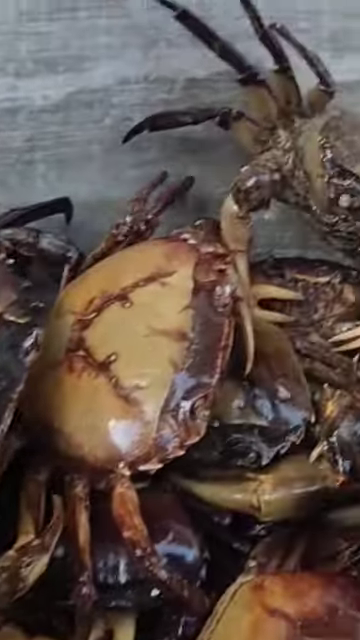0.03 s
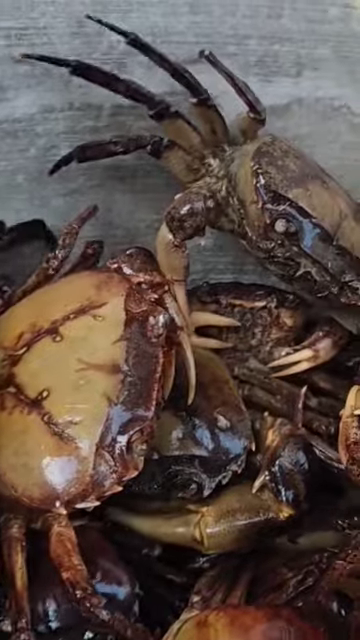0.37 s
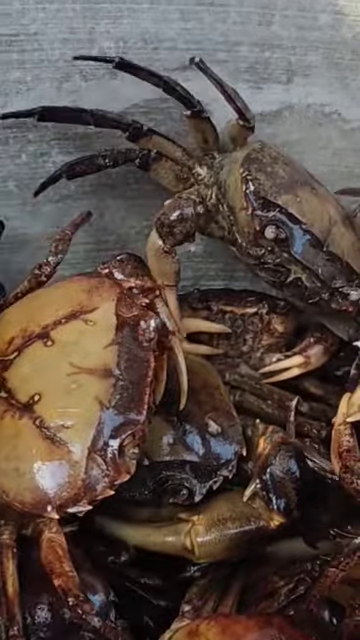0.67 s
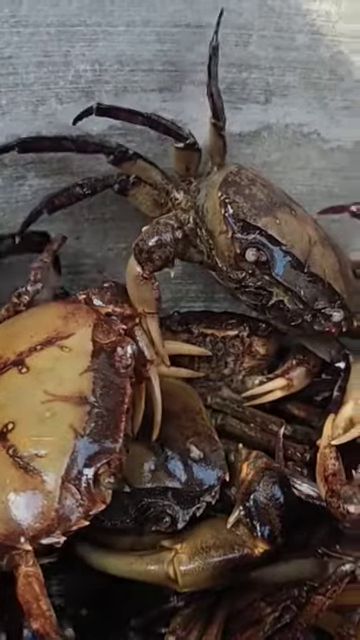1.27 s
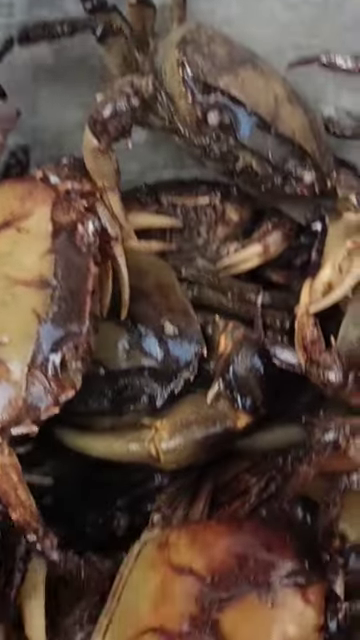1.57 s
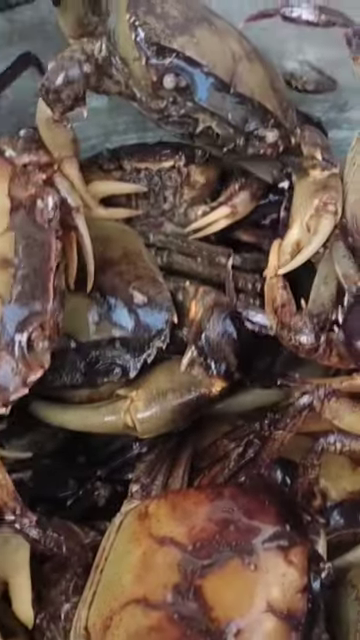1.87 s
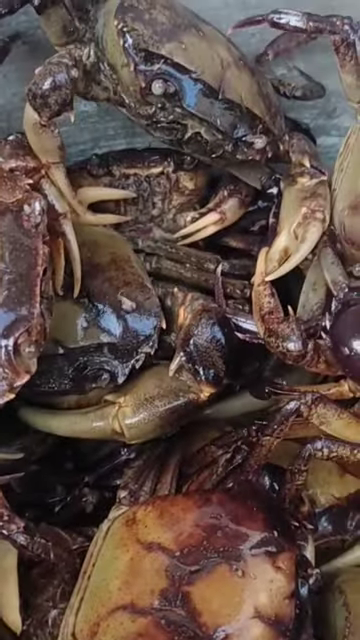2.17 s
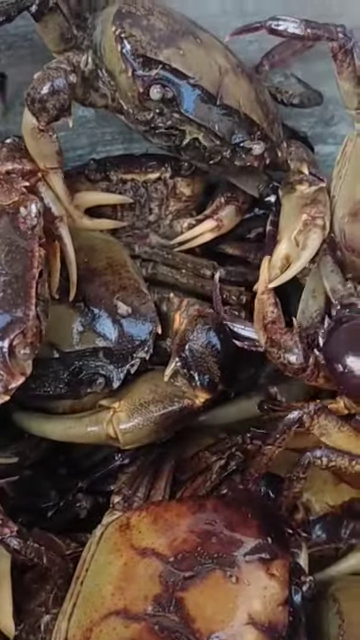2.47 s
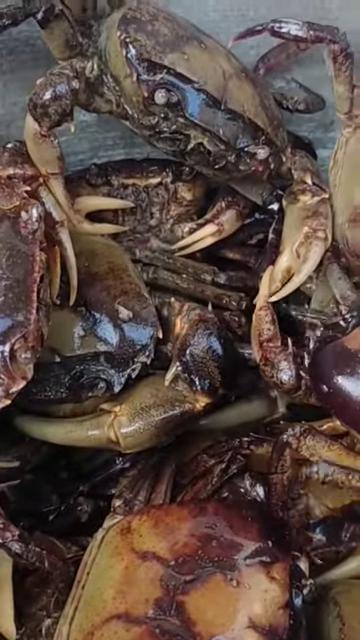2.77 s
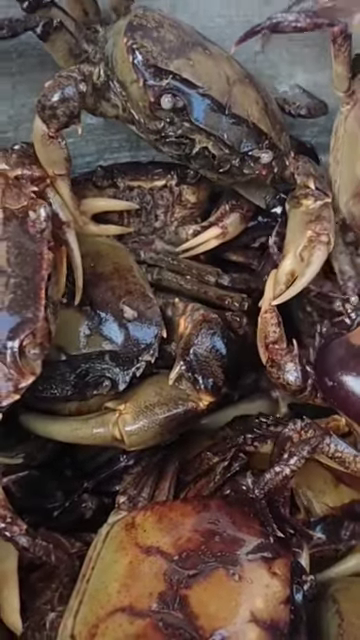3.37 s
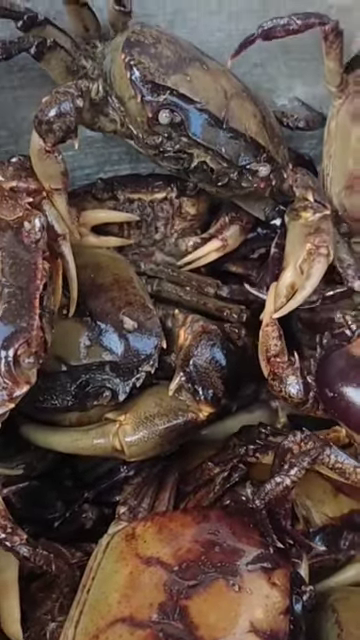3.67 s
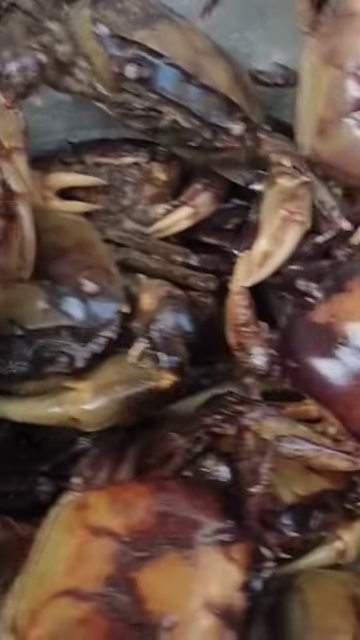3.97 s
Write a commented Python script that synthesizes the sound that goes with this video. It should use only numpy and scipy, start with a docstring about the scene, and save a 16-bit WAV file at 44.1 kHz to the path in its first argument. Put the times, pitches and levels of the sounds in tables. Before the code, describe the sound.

Crab legs scrape and wet shells click in a tub, with a low hum behind.

```python
"""Live crabs in a tub

A heap of crabs shifts close by in a hard-walled tub. Leg tips scrape by stick-slip friction,
wet shells snap and knock, and many tiny contacts merge into rustle and fizz. The contacts excite
the tub's resonances, and its wall bumps once. Behind it lies a steady low rumble with a machine hum."""
import sys
import numpy as np
from scipy import signal
from scipy.fft import rfft, irfft
from scipy.io import wavfile
from scipy.ndimage import uniform_filter1d

SR = 44100
rng = np.random.default_rng(int(sys.argv[2]) if len(sys.argv) > 2 else 0)


def bounce(signal):
    """Save signal as a 16-bit WAV file at the path given by the first command-line argument."""
    frames = np.transpose(np.atleast_2d(signal))
    limited = np.clip(frames, -1, 1)
    pcm = np.round(limited * 32767).astype(np.int16)
    wavfile.write(sys.argv[1], SR, pcm)


N = 176400
T = np.arange(N) / SR
BINS = np.fft.rfftfreq(4096, 1 / SR)
TUB_T60_S, WET_T60_S = 0.056, 0.02  # reverberation times of scraping and of wet clicks


def amp(db):
    """Decibels to amplitude ratio."""
    return 10 ** (np.asarray(db) / 20)


def unit_rms(x):
    """Normalisation to an rms of 1."""
    return x / np.sqrt(np.mean(x ** 2) + 1e-20)


def spectrum_at(points, hz):
    """Interpolation on a log-frequency axis."""
    freqs, values = np.transpose(points)
    return np.interp(np.log(hz + 1), np.log(freqs + 1), values)


def drift(cutoff_hz):
    """Low-pass noise of rms 1: a slow random fluctuation."""
    hz = np.fft.rfftfreq(N, 1 / SR)
    return unit_rms(irfft(rfft(rng.standard_normal(N)) / (1 + (hz / cutoff_hz) ** 2), N))


def add(mix, start_s, sound):
    """Superposition of a stereo sound on the mix."""
    part = mix[:, max(round(start_s * SR), 0):][:, :sound.shape[1]]
    part += sound[:, :part.shape[1]]


def resonance_db(centre_hz, width_hz, lift_db):
    """A resonance as a Lorentzian peak on the decibel spectrum."""
    return lift_db / (1 + (2 * (BINS - centre_hz) / width_hz) ** 2)


def leg_colour_db():
    """Spectral ripple: each leg or shell has its own peaks and dips, which blur in the treble."""
    knots_hz = np.arange(0, SR, 330)
    ripple_db = 2.5 * np.interp(BINS, knots_hz, rng.standard_normal(len(knots_hz)))
    return ripple_db * np.exp(-(BINS / 8000) ** 2)


def tub_ring(x, tone_db):
    """Resonance: a minimum-phase filter applies a contact's tone, the tub's modes and a stereo balance."""
    # Modes of the tub: centre_hz, width_hz, lift_db
    modes = [(932, 50, 9.5), (1860, 24, 10.5), (2170, 25, 6.5), (2383, 100, 5), (2670, 31, 0),
             (5040, 31, 7.5)]
    # Stereo balance of the heap: frequency_hz, left_minus_right_db
    balance = [(500, 15.5), (1100, -10), (3200, -5.5), (4300, 5.5), (6000, 1.5), (12500, 18.5)]
    response_db = tone_db + sum(resonance_db(*mode) for mode in modes)
    left = amp(spectrum_at(balance, BINS))
    gain = amp(response_db) * np.array([left, np.ones_like(left)]) / np.hypot(left, 1)
    log_gain = np.log(np.hstack([gain, gain[:, -2:0:-1]]))
    impulse_response = np.fft.ifft(np.exp(np.conj(signal.hilbert(log_gain)))).real
    return signal.fftconvolve(x, impulse_response, axes=1)


def tub_echoes(x, t60_s, wall_db, right_first=False):
    """Reverberation: direct sound reaches the near ear, then the far; dense wall reflections follow."""
    ear_lag_s = 0.00055
    t = np.arange(0, 0.08, 1 / SR)
    paths = rng.standard_normal((2, len(t))) * amp(-60 * t / t60_s) * (t > ear_lag_s)
    paths *= amp(wall_db) / np.linalg.norm(paths, axis=1, keepdims=True)
    near, far = (1, 0) if right_first else (0, 1)
    paths[near, 0] += 1
    paths[far, round(ear_lag_s * SR)] += 1
    return signal.fftconvolve(x[None], paths, axes=1)


def clicks(size, per_s, spread_db):
    """A Poisson train of impulses, a few stronger than the rest."""
    strength = amp(spread_db * np.minimum(rng.exponential(1, size), 5))
    return strength * rng.choice([-1, 1], size) * (rng.random(size) < per_s / SR)


def at_level(x, length_s, level_db):
    """Equivalent level: the stereo sound gets the energy of level_db held for length_s."""
    return amp(level_db) * x * np.sqrt(2 * length_s * SR) / np.linalg.norm(x)


def rumble():
    """Partly coherent noise: the low rumble is alike in both ears only in the bass."""
    # Rumble spectrum: frequency_hz, level_db
    tone = [(25, -45), (55, -17.5), (72, -9.5), (105, 1.5), (170, 2), (230, -2), (400, -16.5), (620, -16.5),
            (850, -12), (4000, -35)]
    # Likeness of the two channels: frequency_hz, correlation
    likeness = [(180, .99), (300, 0.91), (700, 0)]
    hz = np.fft.rfftfreq(N, 1 / SR)
    left, independent = rfft(rng.standard_normal((2, N)))
    correlation = np.clip(spectrum_at(likeness, hz), 0, 1)
    right = correlation * left + np.sqrt(1 - correlation ** 2) * independent
    noise = irfft(np.array([left, right]) * amp(spectrum_at(tone, hz)), N)
    return amp(-34.5) * unit_rms(noise)


def machine_hum():
    """A line spectrum whose tones waver at random in amplitude and frequency."""
    # Hum tones: pitch_hz, rms_db
    lines = [(115.5, -43.5), (137, -47.5), (159, -50.5), (200, -40.5)]
    wander_hz = 1.5
    out = np.zeros(N)
    for pitch_hz, rms_db in lines:
        flutter = 1 + 0.49 * drift(3.1)
        cycles = rng.random() + np.cumsum(pitch_hz + wander_hz * drift(4.24)) / SR
        out += amp(rms_db) * unit_rms(flutter * np.sin(2 * np.pi * cycles))
    return out


def shifts(depth, per_s=5.1, decay_s=0.033):
    """Relaxation envelope: small movements of the heap start at once and die away."""
    starts = rng.uniform(0.25, 1, N) * (rng.random(N) < per_s / SR)
    movement = signal.lfilter([1], [1, -np.exp(-1 / (decay_s * SR))], starts)
    return 1 + depth * np.tanh(movement)


def heap(tone, per_s, shift_depth, t60_s, right_first=False, spots=4):
    """Shot noise: tiny contacts surge at several spots in the heap, each spot with its own colour."""
    out = np.zeros((2, N))
    for _ in range(spots):
        contacts = clicks(N, per_s / spots, spread_db=2) * shifts(shift_depth)
        reflected = tub_echoes(contacts, t60_s, wall_db=13, right_first=right_first)
        out += tub_ring(reflected, spectrum_at(tone, BINS) + leg_colour_db())[:, :N]
    return unit_rms(out)


def rustle():
    """Midrange shot noise that swells as the heap stirs."""
    # Rustle spectrum: frequency_hz, level_db
    tone = [(200, -15.5), (600, -14), (1000, -4.5), (1400, -4), (2200, 2), (3300, 3.5), (4200, -7),
            (5500, -26.5), (10000, -24)]
    # Stir of the heap: time_s, level_db
    stir = [(0, -31.5), (.5, -32.5), (.6, -36.5), (.75, -28.5), (.98, -33.5), (1.5, -33.5), (1.78, -39.5),
            (1.97, -33.5), (2.3, -35), (2.67, -27), (2.9, -33.5), (3.2, -30), (3.32, -36), (3.56, -27.5),
            (4, -31)]
    envelope = amp(np.interp(T, *np.transpose(stir)))
    return envelope * heap(tone, per_s=1300, shift_depth=2.5, t60_s=TUB_T60_S)


def fizz(scraping):
    """Dense treble shot noise from wet shells, a little louder while a leg scrapes."""
    # Fizz spectrum: frequency_hz, level_db
    tone = [(2000, -30), (4500, 4), (8500, -6), (11000, -6), (12000, .5), (14300, -2.5), (15000, -28)]
    # Wet crackle of the heap: time_s, level_db
    crackle = [(0, -38), (.58, -46), (.73, -39.5), (.9, -44), (1.77, -45), (1.87, -40), (2.3, -42.5),
               (2.62, -37), (3.32, -39.5), (3.52, -38.5), (4, -42)]
    envelope = amp(np.interp(T, *np.transpose(crackle)) + 2.5 * scraping)
    return envelope * heap(tone, per_s=5000, shift_depth=6, t60_s=WET_T60_S, right_first=True)


def wall_bump(start_s=2.2925, pitch_hz=200, t60_s=0.021):
    """Damped oscillation: the tub wall gives once, and its velocity is what is heard."""
    t = np.maximum(T - start_s, 0)
    onset = np.sin(np.pi / 2 * np.minimum(pitch_hz * t, 1)) ** 2
    displacement = amp(-60 * t / t60_s) * onset * np.sin(2 * np.pi * pitch_hz * t)
    return np.gradient(displacement) * SR / (2 * np.pi * pitch_hz)


def shell_knocks():
    """Impulse response: each hard contact leaves a short hollow ring in the tub."""
    # Shells striking the tub: start_s, peak_db, centre_hz, fall_at_one_octave_db
    impacts = [(0.46, -19.5, 900, 8.5), (2.2175, -10, 1220, 6.5), (2.3215, -4.5, 1480, 6.5),
               (2.664, -22, 740, 10), (3.363, -18.5, 895, 8), (3.864, -14.5, 880, 26),
               (3.971, -13.5, 1060, 14)]
    out = np.zeros((2, N))
    for start_s, peak_db, centre_hz, fall_db in impacts:
        tone_db = np.maximum(-fall_db * np.log2((BINS + 1) / centre_hz) ** 2, -50)
        knock = tub_ring(tub_echoes(np.ones(1), t60_s=0.035, wall_db=-5), tone_db)
        add(out, start_s, amp(peak_db) * knock / abs(knock).max())
    return out


def shell_snaps():
    """Sudden release: wet shells let go in a quick bunch of bright clicks."""
    # Snaps of shell on shell: start_s, length_s, level_db
    releases = [(0.712, 0.055, -41.5), (1.005, 0.0038, -34), (1.122, .003, -32.5), (1.52, 0.003, -27.5),
                (2.194, 0.003, -45), (2.897, 0.037, -33), (3.18, 0.0099, -23), (3.229, .027, -35),
                (3.362, 0.008, -32.5), (3.4, 0.037, -39), (3.582, 0.031, -37), (3.716, 0.0056, -28),
                (3.743, 0.031, -33.5), (3.864, .004, -28.5), (3.889, 0.018, -36)]
    # Snap spectrum: frequency_hz, level_db
    tone = [(1500, -57), (4000, 9.5), (8500, -2), (12000, 15.5), (16000, 0)]
    out, t = np.zeros((2, N)), np.arange(SR // 10) / SR
    for start_s, length_s, level_db in releases:
        force = clicks(len(t), per_s=3000, spread_db=0.69)
        force[0] = 3.5  # the first click is the strongest
        force *= amp(-9 * t / length_s) * (t < length_s)
        reflected = tub_echoes(force, WET_T60_S, wall_db=-8, right_first=True)
        snap = tub_ring(reflected, spectrum_at(tone, BINS))
        add(out, start_s, at_level(snap, length_s, level_db))
    return out


def stick_slip(t, slips_per_s=290, jitter=0.35, spread_db=1.6, grit_db=-22):
    """Stick-slip friction: a leg tip catches, then slips in uneven jerks with fine grit between them."""
    gap_scatter, size_scatter = rng.standard_normal((2, 64))
    gaps_s = np.exp(jitter * gap_scatter) / slips_per_s
    sizes = amp(spread_db * size_scatter)
    gaps_s[0], sizes[0] = 0.001, 1.4  # a prompt, firm first slip
    slip_s = np.cumsum(gaps_s)
    inside = slip_s < t[-1]
    force = amp(grit_db) * rng.standard_normal(len(t))
    force[(slip_s[inside] * SR).astype(int)] += sizes[inside]
    return force


def leg_scrapes():
    """Friction drives shell and tub resonances; returns the sound and a soft 0-1 gate of the scraping."""
    # Strokes of the leg tips: start_s, length_s, swell_s, level_db, centre_hz
    strokes = [(0.1, 0.032, 0.0056, -23, 2960), (0.398, 0.053, 0.00066, -20.5, 2760),
               (0.493, 0.048, 0.00077, -22, 2670), (0.734, 0.048, 0.018, -28, 2660),
               (0.87, 0.031, 0.02, -34, 2500), (0.934, 0.046, 0.024, -28.5, 2560),
               (1.05, 0.031, 0.0054, -32.5, 2646), (1.152, 0.063, 0.015, -33.5, 2400),
               (1.209, 0.03, 0.016, -31, 2470), (1.33, 0.014, 0.0067, -36, 3020),
               (1.381, 0.0085, 0.0011, -28, 2780), (1.448, 0.026, 0.0044, -32, 2620),
               (1.667, 0.031, 0.013, -34, 2540), (1.736, 0.0091, .003, -37, 3640),
               (1.831, 0.039, 0.015, -31.5, 2540), (2.008, 0.043, 0.0053, -20, 2680),
               (2.195, 0.0083, 0.00063, -17, 3300), (2.395, 0.029, 0.0007, -23, 3020),
               (2.608, 0.04, 0.0092, -20.5, 2720), (2.904, 0.029, 0.0016, -13.5, 2900),
               (2.933, 0.022, 0.0012, -21, 3120), (3.062, 0.0095, 0.0067, -25.5, 2830),
               (3.18, 0.019, 0.0014, -23, 2730), (3.203, 0.043, 0.026, -26.5, 3100),
               (3.399, 0.018, 0.0007, -23, 2800), (3.512, .015, 0.0035, -23.5, 3000),
               (3.553, 0.06, 0.017, -19, 2820), (3.626, 0.017, 0.007, -21.5, 2840),
               (3.713, 0.0071, 0.00085, -20.5, 2560), (3.877, 0.026, 0.013, -25, 2410)]
    # Scrape spectrum: frequency_hz, level_db
    tone = [(400, -51), (1200, -13.5), (1800, -8), (2600, 1), (3400, 1), (4100, -2.5), (5200, -20),
            (9000, -30.5)]
    usual_hz = 3030
    octaves = np.log2(np.clip(BINS, 1500, 4200) / usual_hz)
    out, t = np.zeros((2, N)), np.arange(SR // 10) / SR
    scraping = np.zeros(N)
    catches = amp(2.2 * drift(90))
    for start_s, length_s, swell_s, level_db, centre_hz in strokes:
        ramps = np.clip(np.minimum(t, length_s + swell_s - t) / swell_s, 0, 1)
        envelope = ramps * amp(-4 * t / length_s)
        force = stick_slip(t) * envelope * catches[round(start_s * SR):][:len(t)]
        tilt_db = 32 * np.log2(centre_hz / usual_hz) * octaves  # lower strokes are duller
        shell_db = resonance_db(1.072 * centre_hz, width_hz=450, lift_db=3.5)
        tone_db = spectrum_at(tone, BINS) + tilt_db + shell_db + leg_colour_db()
        scrape = tub_ring(tub_echoes(force, TUB_T60_S, wall_db=-3), tone_db)
        add(out, start_s, at_level(scrape, length_s, level_db))
        scraping[(T > start_s) & (T < start_s + length_s)] = 1
    return out, uniform_filter1d(scraping, 400)


def scene():
    """Superposition of single contacts, rustle and fizz over the rumble and hum."""
    scrapes, scraping = leg_scrapes()
    contacts = scrapes + shell_snaps() + shell_knocks() + wall_bump()
    return contacts + rustle() + fizz(scraping) + rumble() + machine_hum()


def record(dry):
    """Band limiting: a low-pass filter removes the treble above 14.6 kHz."""
    low_pass = signal.firwin(255, 14600, window=("kaiser", 8), fs=SR)
    return signal.oaconvolve(dry, low_pass[None], "same")


dry = scene()
out = record(dry)
bounce(out)
```